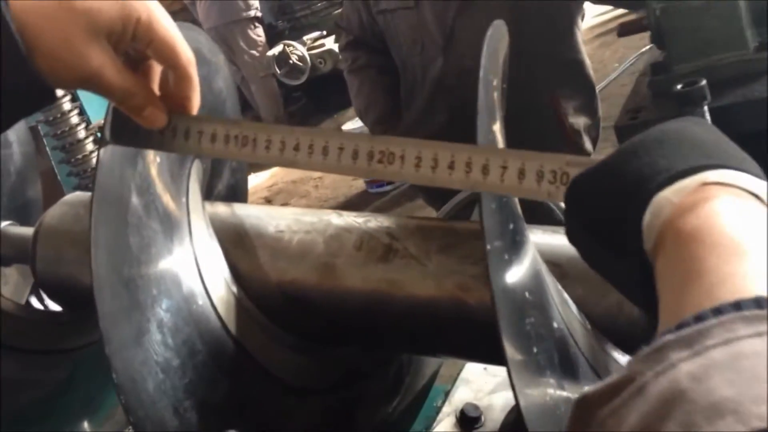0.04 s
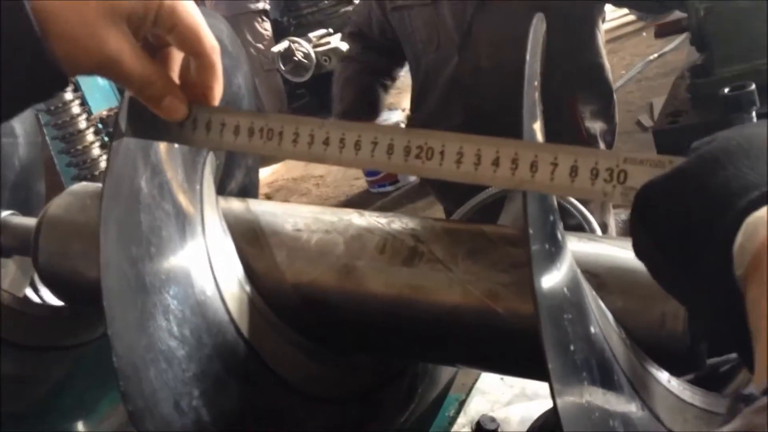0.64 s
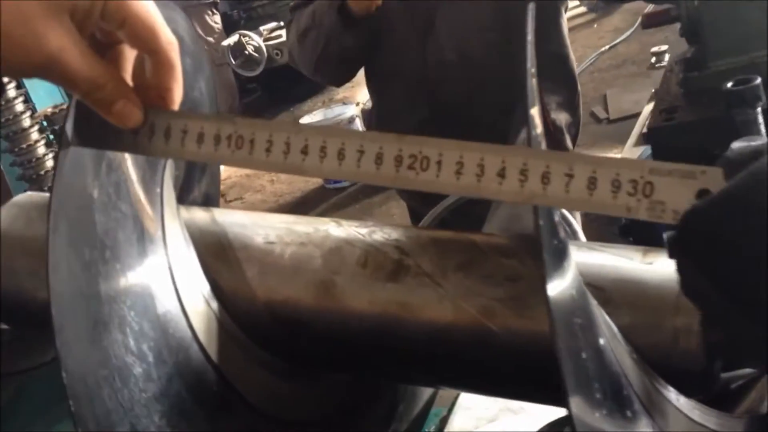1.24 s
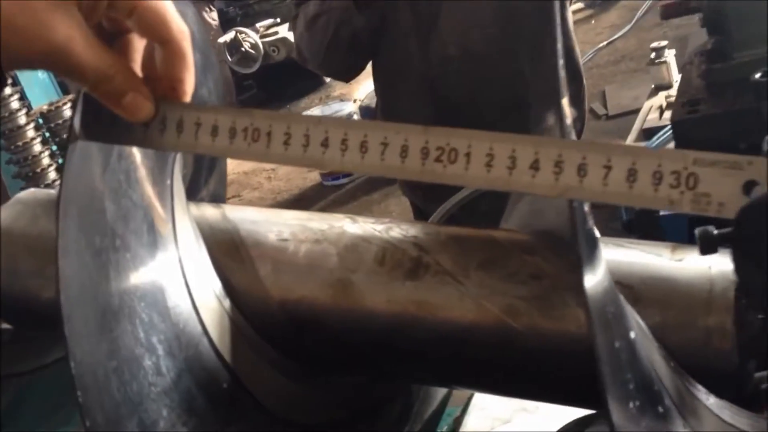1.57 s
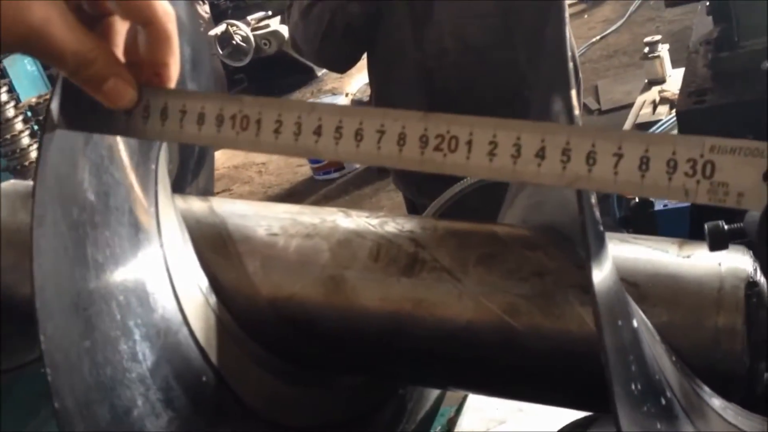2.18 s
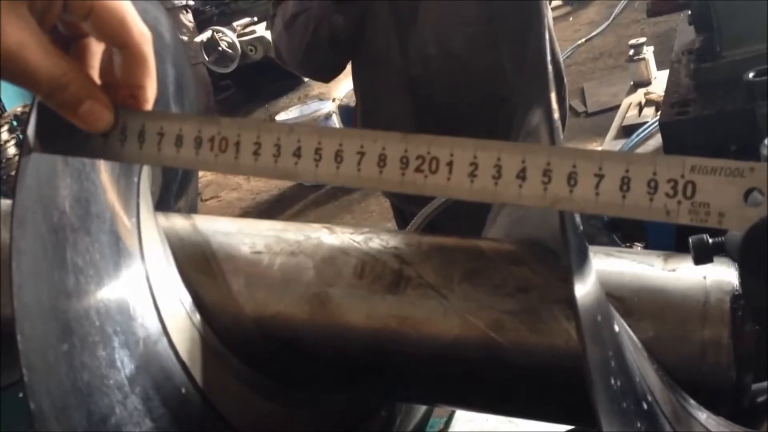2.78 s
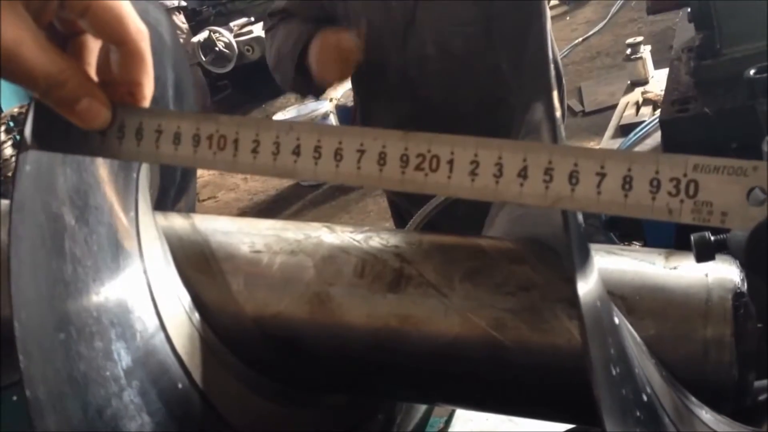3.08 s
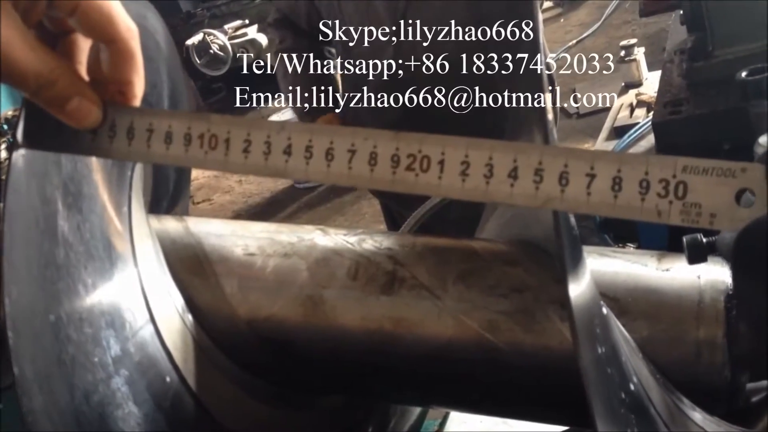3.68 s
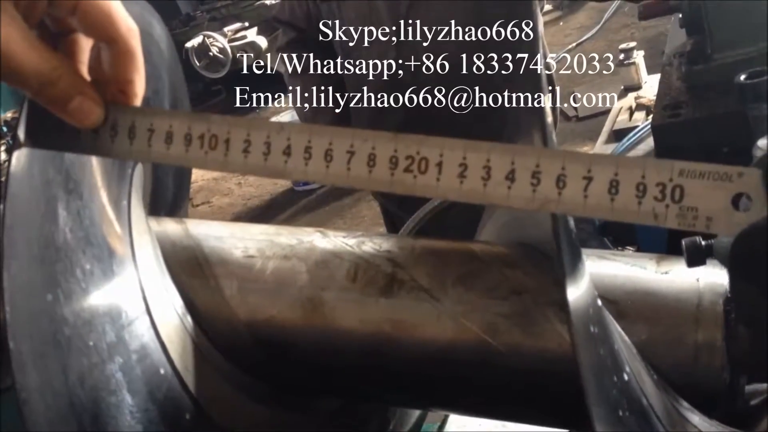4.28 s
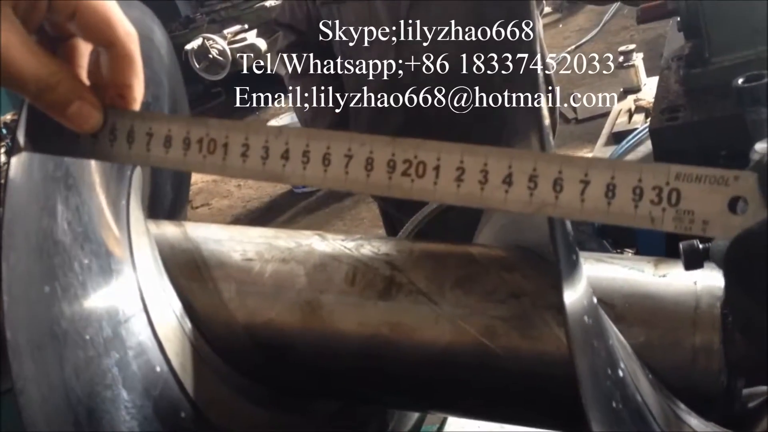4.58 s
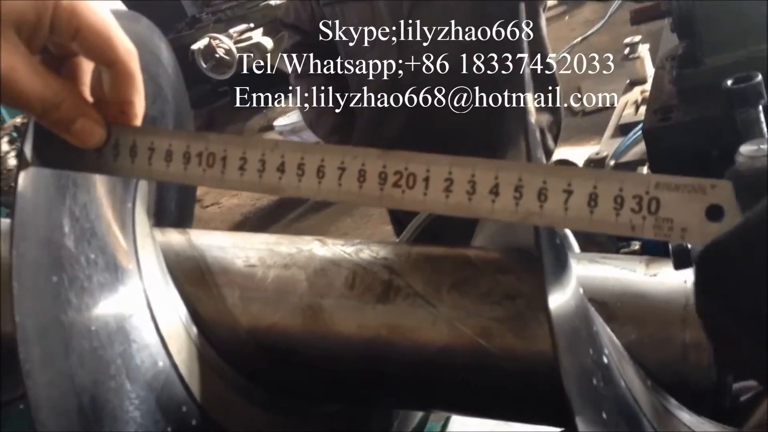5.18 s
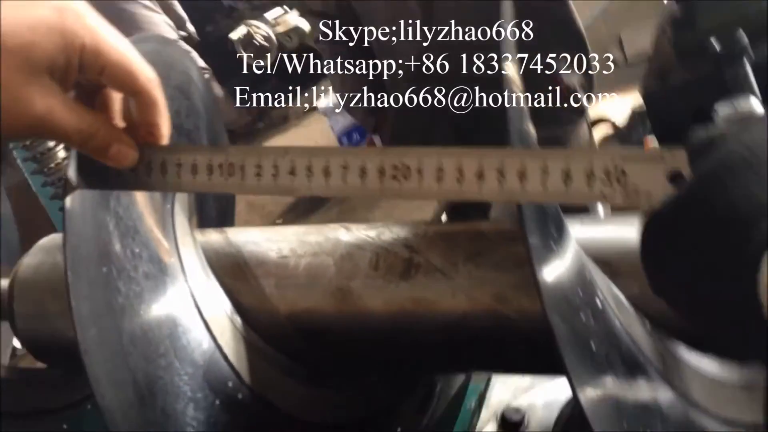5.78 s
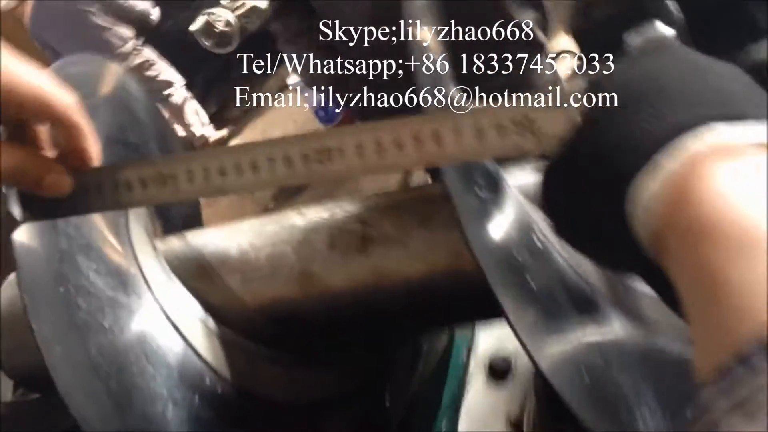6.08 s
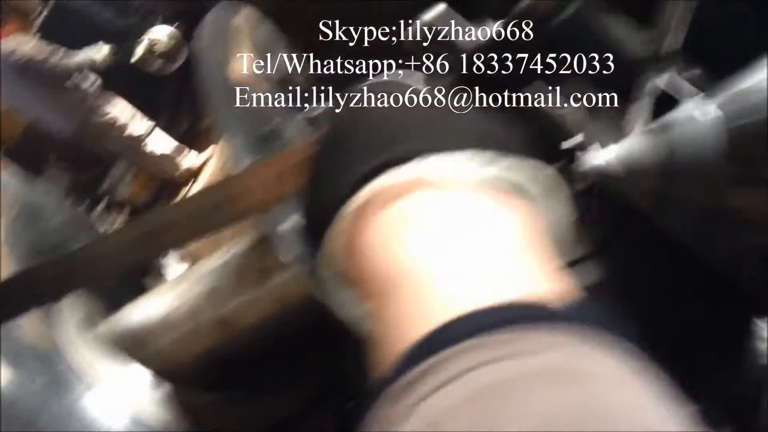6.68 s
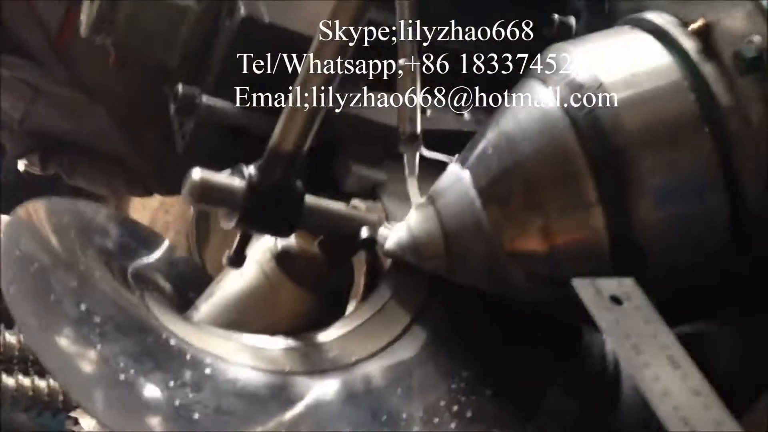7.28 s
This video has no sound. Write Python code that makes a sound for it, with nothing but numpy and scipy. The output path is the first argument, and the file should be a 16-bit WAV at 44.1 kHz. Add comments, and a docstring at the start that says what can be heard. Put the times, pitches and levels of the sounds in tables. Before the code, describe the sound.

A machine tool's cutter chatters loudly against steel, making a ringing drone with a scraping hiss. It starts as a piercing squeal, loosens into a grinding rattle, squeals again, then settles into a lower, harsh buzz. Near the end it stutters, biting back in with short crunches, and finishes in a growl. The workshop walls echo, and other machines rumble faintly underneath.

```python
"""A loud, squealing chatter fills a metal workshop: a machine tool's cutter strikes the steel work
80 to 160 times a second. Every strike rings the steel and scrapes off a hissing chip.
Even strikes make a steady drone, with a squeal in the two fastest spells; uneven ones make a loose rattle.
Near the end the cutter stalls four times, biting back in with a crunch, and finishes in a growl.
The walls echo, and other machines rumble underneath."""
import sys
import numpy as np
from scipy import signal
from scipy.fft import rfft, irfft, next_fast_len
from scipy.io import wavfile
from scipy.ndimage import uniform_filter1d, map_coordinates

SR = 44100
rng = np.random.default_rng(int(sys.argv[2]) if len(sys.argv) > 2 else 0)


def dump_mix(stems):
    """Bounce the given channels to the path in sys.argv[1] as a 16-bit WAV at rate SR."""
    frames = np.atleast_2d(stems).T  # one column per channel
    limited = np.clip(frames, -1, 1)  # hard clip at full scale
    pcm = np.round(limited * 32767).astype(np.int16)
    wavfile.write(sys.argv[1], SR, pcm)


N = 323694

# How the steel rings in each kind of chatter. Each row: frequency in Hz, relative level in dB.
WHINE_START = [(155, -24.5), (310, -11), (465, -22.5), (620, -8), (930, -13), (1240, -18.5), (1395, -6),
               (1550, -5.5), (1700, -22), (1860, -6), (2200, -11.5), (2480, -11.5), (2640, -16), (2935, -8),
               (3100, -16), (3500, -19), (3865, -13.5)]
WHINE = [(150, -32), (300, -11), (760, -12.5), (915, -16.5), (1220, -13.5), (1525, -5.5), (1680, -20),
         (1830, -17), (1980, -6.5), (2130, -15), (2290, -13), (2440, -9.5), (2740, -19), (2900, -10.5),
         (3050, -13), (3200, -23), (4110, -15.5)]
RATTLE = [(170, -16), (250, -20), (335, -10), (420, -18), (580, -11), (670, -13), (750, -5.5), (850, -12),
          (1000, -9.5), (1380, -13), (1520, -3), (1680, 0), (1770, -9), (2060, -9), (2320, -1), (2420, -8),
          (3090, -10), (4180, -21)]
GRINDING = [(170, -20), (410, -15), (560, -8), (1000, -11), (1380, -13), (1520, -1), (1680, 1.5),
            (1790, -9.5), (2060, -10.5), (2200, -4), (2650, -7), (3100, -13), (4180, -23)]
SCREAM = [(160, -32.5), (320, -13), (470, -15.5), (630, -10), (800, -11), (1110, -18), (1420, -12),
          (1585, -19), (1740, -5), (1900, -11.5), (2210, -7), (2370, -10), (2550, -6), (3000, -13.5),
          (3400, -11), (3640, -12.5), (4110, -21.5)]
LIMP = [(160, -28), (320, -13), (480, -16), (640, -13.5), (720, -20), (800, -14.5), (1180, -12),
        (1360, -18), (1525, -2.5), (1610, 2), (1690, 0.5), (1845, -19.5), (2005, -18), (2165, -6),
        (2325, -14), (2520, -7), (2900, -14.5), (4150, -18.5)]
CLATTER = [(170, -16), (260, -18.5), (470, -14.5), (550, -4.5), (640, -9.5), (720, -12), (1150, -10.5),
           (1400, -13.5), (1510, -0.5), (1680, 2.5), (1780, -13), (2030, -14), (2170, -3), (2450, -7.5),
           (2750, -14.5), (2980, -8), (3200, -16), (4180, -22)]
BUZZ = [(190, -18), (280, -9), (480, -7.5), (860, -11), (960, -6), (1140, -8), (1230, -14), (1430, -7),
        (1530, 3), (1620, 2.5), (1950, -10), (2100, -4), (2450, -5), (2700, -10.5), (3620, -11),
        (4200, -24)]
BROAD_BUZZ = [(190, -18), (280, -6.5), (380, -11), (660, -8), (780, -12), (960, -4), (1140, -6),
              (1230, -15), (1330, -2), (1530, 1), (1750, 0), (1950, -8), (2450, -4.5), (2750, -11),
              (4000, -9), (4200, -24)]
DULL_BUZZ = [(150, -21), (188, -22), (278, -13), (523, -15.5), (664, -8.5), (775, -23), (832, -17),
             (957, -17), (1180, -12), (1290, -7), (1680, 0.5), (1990, -12.5), (2290, -9), (3110, -14.5),
             (3740, -15), (4300, -19)]
STUTTER = [(170, -13.5), (250, -8.5), (330, -14), (550, -10.5), (650, -3), (780, -13), (950, -13),
           (1300, -6), (1480, -6), (1670, 2.5), (1780, -11.5), (2320, -9), (2570, -15), (3070, -12.5),
           (3740, -17), (3900, -12), (4150, -16)]
GROWL = [(130, -22), (250, 0), (380, -13.5), (500, -7), (630, -1.5), (750, -16), (1000, -12), (1130, -0.5),
         (1630, -3), (1760, -9), (1880, -6), (2130, -4.5), (2630, -15), (2880, -3), (3010, -13.5),
         (3640, -9), (4400, -11)]
# The chip's hiss under a hard and a light cut. Each row: frequency in Hz, relative level in dB.
HARD = [(2800, -31), (3900, -3), (7500, -6), (7800, 0), (9300, -6.5), (9850, -1.5), (10200, -5),
        (11400, -6.5), (13500, -8.5), (13800, -6), (15000, -8.5)]
LIGHT = [(2800, -31), (3900, -2.5), (4300, -6), (4800, -2), (6300, -6), (6650, -0.5), (6950, -6.5),
         (8700, -1.5), (9500, -8), (9850, -2.5), (10600, -7.5), (15000, -10)]
# The spells of chatter. Each row: start in seconds, ring table, hiss table, timing scatter as a share
# of the gap between strikes, lag of every second strike in seconds, share of fresh noise in the hiss,
# rasp in relative dB, drone in relative dB.
CHATTER_SPELLS = [ (0, WHINE_START, HARD, .0011, 0, 0.26, -15, -3),
                  (.345, WHINE, HARD, .0013, 0, 0.27, -17, -4),
                  (.782, RATTLE, HARD, 0.0091, 0, 0.65, -11, -7),
                  (1.25, GRINDING, HARD, .016, 0.00015, 0.7, -10.5, -7.5),
                  (2.615, SCREAM, HARD, 0.00076, 0, 0.1, -19, -5.5),
                  (3.27, SCREAM, HARD, .0012, 0, .24, -17, -5.5),
                  (3.58, LIMP, LIGHT, 0.00097, 0.00015, 0.2, -17, -6.5),
                  (3.903, CLATTER, LIGHT, .015, 0, .49, -8.5, -7),
                  (4.36, LIMP, LIGHT, 0.006, 0, 0.4, -9, -7), (4.56, BUZZ, LIGHT, .0012, 0, .2, -12, -6),
                  (5.15, BROAD_BUZZ, LIGHT, .0012, 0, .2, -12, -6),
                  (5.94, DULL_BUZZ, LIGHT, .0009, 0, .22, -13, -6.5),
                  (6.34, STUTTER, LIGHT, 0.0038, 0, .57, -7, -3),
                  (6.66, STUTTER, LIGHT, .02, 0.00024, 0.67, -4, 1),
                  (7.012, GROWL, LIGHT, .0013, 0, .33, -11, 3)]
# The cutter barely touches, then bites again.
# Each row: start of the stall in seconds, time of the bite in seconds, crunch level in dB.
STALLS = [(6.714, 6.731, -21), (6.812, 6.843, -13), (6.907, 6.93, -14), (6.978, 7.014, -28)]
GRIP_S = 0.00061  # how fast the scraping rises as the cutter digs in


def amp(db):
    """Turn decibels into a gain."""
    return 10 ** (np.asarray(db) / 20)


def unit(x):
    """Scale x to an average (rms) level of 1."""
    return x / np.sqrt(np.mean(x ** 2) + 1e-20)


def along(points, hz):
    """Read between rows of frequency and value, on a log frequency scale."""
    frequencies, values = np.transpose(points)
    return np.interp(np.log(hz + 1), np.log(frequencies + 1), values)


def curves(rows):
    """Give one value per sample for each column after the time."""
    seconds, *columns = np.transpose(rows)
    return [np.interp(np.arange(N) / SR, seconds, column) for column in columns]


def wobble(rate):
    """Draw a smooth curve through `rate` random points a second."""
    return map_coordinates(rng.standard_normal(size=64), [np.arange(N) * rate / SR], mode="mirror")


def filtered(x, response):
    """Scale each frequency in x by the gain that response(hz) gives."""
    size = next_fast_len(len(x) + 8192)
    return irfft(rfft(x, size) * response(np.fft.rfftfreq(size, 1 / SR)), size)[:len(x)]


def through(x, response):
    """Pass x through something that answers one click with `response`."""
    return signal.fftconvolve(x, response)[:len(x)]


def impulses(times, force, size):
    """Make clean clicks that may fall between samples."""
    centres = times[:, None] * SR + 8
    taps = np.floor(centres).astype(int) + np.arange(-7, 9)
    shape = np.sinc(taps - centres) * np.cos(np.pi * (taps - centres) / 16) ** 2
    return np.bincount(taps.ravel(), (force[:, None] * shape).ravel(), size)[:size]


def body(spectrum, size=4096):
    """How an object with this spectrum answers one click."""
    gain = amp(along(spectrum, np.fft.rfftfreq(size, 1 / SR)))
    cepstrum = irfft(np.log(gain + 1e-6))
    cepstrum[1:size // 2] *= 2  # folded so that nothing sounds before the click
    cepstrum[size // 2 + 1:] = 0
    return irfft(np.exp(rfft(cepstrum)))


def strikes():
    """The cutter hits the steel, evenly or loosely: give each strike's time, strength and spell."""
    # How often it strikes, stretch after stretch. Each row: time in seconds, strikes a second.
    whine_rate = [(0.0, 157), (0.034, 155.4), (0.268, 154.3), (0.362, 152.6), (0.77, 152.7)]
    rattle_rate = [(.785, 83.63), (2.598, 83.84)]
    scream_rate = [(2.602, 157.2), (3.458, 158.6), (3.57, 159.6)]
    limp_rate = [(3.59, 160.9), (3.8, 160.5), (3.895, 158.7), (3.91, 85.15), (4.301, 86.07)]
    buzz_rate = [(4.34, 93.4), (4.38, 94.6), (4.41, 94.12), (4.78, 95.4), (5.86, 94.8), (6.27, 94.03),
                 (6.34, 92.9)]
    end_rate = [(6.43, 90.2), (6.5, 85.8), (6.65, 83), (7.005, 79.9), (7.019, 125.5), (7.34, 125.4)]
    uneven_db, uneven_db_per_scatter, fully_loose_scatter = 0.38, 48, 0.0084
    surge_peak_s, surge_period_s, surge_db = 0.94, .285, 0.54
    stall_db, bite_db = -11, 1

    starts, _, _, scatters, lags, *_ = map(list, zip(*CHATTER_SPELLS))
    spell_at = lambda seconds: np.maximum(np.searchsorted(starts, seconds, side="right") - 1, 0)
    rate = np.vstack([whine_rate, rattle_rate, scream_rate, limp_rate, buzz_rate, end_rate])
    t = np.arange(N) / SR
    strikes_so_far = np.cumsum(curves(rate)[0]) / SR
    k = np.arange(int(strikes_so_far[-1]))
    spell = spell_at(np.interp(k, strikes_so_far, t))
    slip, weight = rng.standard_normal(size=(2, 1000))
    scatter = np.take(scatters, spell)
    limp = uniform_filter1d(np.take(lags, spell), size=14)  # the limp creeps in over several strikes
    times = np.interp(k + np.cumsum(scatter * slip[k]), strikes_so_far, t) + limp * (k % 2)
    # a loose rattle is uneven in strength as well as in time, and comes in surges
    looseness = np.minimum(scatter / fully_loose_scatter, 1)
    surge = looseness * np.cos(2 * np.pi * (times - surge_peak_s) / surge_period_s)
    force_db = (uneven_db + uneven_db_per_scatter * scatter) * weight[k] + surge_db * surge
    for start, bite, _ in STALLS:
        force_db[(times > start) & (times < bite)] += stall_db
        nearest = np.argmin(np.abs(times - bite))
        times[nearest:] += bite - times[nearest]  # the beat restarts from the bite
        force_db[nearest] = bite_db
    return times, amp(force_db), spell_at(times)


def smear(spacing_hz, width_hz, size=4096, count=60):
    """The steel's many resonances each hold back part of a strike: it gets longer, not brighter."""
    resonances = spacing_hz * (np.arange(count) + rng.random(count))[:, None]
    hz = np.fft.rfftfreq(size, 1 / SR)
    phase_lag = 2 * np.arctan2(hz * width_hz, resonances ** 2 - hz ** 2).sum(axis=0)
    return irfft(np.exp(-1j * phase_lag))


def friction(clicks, fade_s):
    """Rubbing makes fresh noise that flares at every strike, falling 60 dB per fade_s."""
    t = np.arange(SR // 10) / SR
    flare = amp(-60 * t / fade_s) * (1 - np.exp(-t / GRIP_S))
    power = through(clicks ** 2, flare ** 2)
    return unit(np.sqrt(np.abs(power)) * rng.standard_normal(len(clicks)))


def steel_ring(ring):
    """The steel answers one click, ringing only between the deep bass and the treble."""
    return body([(70, -48), *ring, (5500, -43)])  # the ring dies out at these ends, given in Hz and dB


def scrape(clicks, fade_s, renew_s):
    """Each strike repeats nearly the same scrape, which changes as the cutter moves on."""
    t = np.arange(SR // 20) / SR
    flare = amp(-60 * t / fade_s) * (1 - np.exp(-t / GRIP_S))
    place = np.arange(len(clicks)) / SR / renew_s
    out = np.zeros(len(clicks))
    for k in range(int(place[-1]) + 2):
        spectrum = rfft(rng.standard_normal(len(t)) * flare)
        strength = np.abs(spectrum)
        burst = irfft(spectrum / np.maximum(strength, np.median(strength)))  # no overtone sticks out
        blend = np.cos(np.pi / 2 * np.clip(place - k, -1, 1))
        out += through(clicks, unit(burst)) * blend
    return unit(out)


def chatter(times, force, spell):
    """Spell after spell, the strikes drive the steel's ring, the chip's hiss and a low drone."""
    # Loudness up to the stalls, then in the closing growl.
    # Each row: time in seconds, ring in relative dB, hiss and drone in relative dB.
    levels = [(0.0, -16, -14), (0.03, -15, -18), (0.4, -16, -18), (0.765, -17, -17.5), (0.795, -16, -17),
              (1.0, -16, -15.5), (1.04, -17, -17.5), (2.01, -17, -18), (2.53, -15, -18), (2.68, -16, -17.5),
              (2.94, -14, -15.5), (3.52, -16.5, -16.5), (3.64, -13, -18), (3.83, -12.5, -16.5),
              (4.04, -16, -19.5), (4.6, -15.5, -18.5), (5.77, -14.5, -16.5), (6.53, -16, -21.5),
              (6.64, -13.5, -20.5), (6.68, -16.5, -24)]
    growl_levels = [(7.05, -15, -21), (7.3, -13.5, -19.5)]
    ring_trim_db, hiss_trim_db, drone_top_hz = -0.6, -0.3, 1200
    layers = np.zeros((2, N + SR))
    steel = smear(spacing_hz=290, width_hz=130)
    machine_bed = smear(spacing_hz=140, width_hz=60)
    for k, (_, ring, hiss, _, _, fresh, rasp_db, drone_db) in enumerate(CHATTER_SPELLS):
        share = uniform_filter1d(np.where(spell == k, 1., 0.), size=5)  # spells blend over 5 strikes
        active = share > 1e-6
        share, own_times = share[active], times[active]
        first = int(own_times[0] * SR)
        span = int((own_times[-1] - own_times[0]) * SR)
        size = span + SR // 10
        offsets = own_times - first / SR
        blows = impulses(offsets, force[active] * share, size)
        rubs = impulses(offsets, force[active] * np.sqrt(share), size)  # noise adds up in power

        push = unit(through(blows, steel)) + amp(rasp_db) * friction(rubs, fade_s=0.16)
        vibration = through(push, steel_ring(ring))
        low = filtered(vibration, lambda hz: hz < drone_top_hz)
        drone = through(low, machine_bed)  # low waves wander on through the machine's base
        chip = np.sqrt(1 - fresh) * scrape(rubs, fade_s=0.06, renew_s=.6)
        chip += np.sqrt(fresh) * friction(rubs, fade_s=0.12)
        ringing = amp(ring_trim_db) * unit(vibration - low)
        cutting = amp(hiss_trim_db) * unit(through(chip, body(hiss))) + amp(drone_db) * unit(drone)
        length_gain = np.sqrt(share.mean() * span / size)  # keeps short and long spells equally loud
        layers[:, first:first + size] += np.array([ringing, cutting]) * length_gain
    gains = amp(curves(np.vstack([levels, growl_levels])))
    return np.sum(layers[:, :N] * gains, axis=0)


def squeal(times):
    """The cutter's own resonance locks to a multiple of the strike rate and sings one piercing tone."""
    # The squeal in the two fastest spells. Each row: time in seconds, level in dB.
    whine_levels = [(0, -27), (.048, -20), (.284, -19), (.37, -16), (.43, -15), (.772, -15.5), (.8, -90)]
    scream_levels = [(2.57, -92), (2.62, -22.5), (2.8, -17), (2.85, -15.5), (3.42, -15.5), (3.58, -19.5),
                     (3.75, -90)]
    waver_db = .5
    phase = 2 * np.pi * np.interp(np.arange(N) / SR, times, np.arange(len(times)))
    whine = amp(curves(whine_levels)[0]) * np.sin(11 * phase)
    scream = amp(curves(scream_levels)[0]) * np.sin(10 * phase)
    return amp(waver_db * wobble(rate=14)) * np.sqrt(2) * (whine + scream)


def steel_reflection(x, delay_s, sway_s, sway_rate):
    """Sound bounces off nearby steel; the hand-held microphone sways, so overtones swell and fade."""
    treble = filtered(x, lambda hz: 1 / (1 + (2000 / (hz + 1)) ** 8))  # a small face mirrors only treble
    delay = delay_s + sway_s * wobble(sway_rate)
    return map_coordinates(treble, [np.arange(N) - delay * SR])


def wall_echo(x):
    """The walls answer, the treble dying first."""
    # How long the echo lasts. Each row: frequency in Hz, seconds to fade by 60 dB.
    fade_times = [(200, 0.34), (2000, 0.51), (10000, 0.02)]
    hz, t, noise = signal.stft(rng.standard_normal(SR // 2), SR, nperseg=256)
    fade = amp(-60 * t / along(fade_times, hz)[:, None])
    tail = signal.istft(noise * fade, SR, nperseg=256)[1]
    return through(x, np.pad(tail, (SR // 100, 0)) / np.linalg.norm(tail))


def other_machines():
    """Other machines rumble, wandering a little in level, and running motors add thin tones."""
    # The rumble's spectrum. Each row: frequency in Hz, relative level in dB.
    rumble_spectrum = [(25, -30), (70, -22), (105, -11), (135, -9), (165, -3.5), (220, -1), (400, -7.5),
                       (900, -6), (2000, -28.5)]
    # The motors' tones. Each row: pitch in Hz, level in dB.
    motor_tones = [(210, -49), (1001, -43)]
    rumble_db, wander_db = -40.5, 3
    rumble = unit(filtered(rng.standard_normal(N), lambda hz: amp(along(rumble_spectrum, hz))))
    t = np.arange(N) / SR
    tones = sum(amp(db) * np.sqrt(2) * np.sin(2 * np.pi * hz * t + wobble(rate=7))
                for hz, db in motor_tones)
    return amp(rumble_db + wander_db * wobble(rate=3.975)) * rumble + tones


def bites():
    """After each stall the cutter digs in with a short crunch of ring and hiss."""
    fade_s, hiss_db = .05, -5
    out, t = np.zeros(N), np.arange(SR // 10) / SR
    for _, bite, db in STALLS:
        noise = rng.standard_normal(len(t))
        ring = unit(through(noise, steel_ring(STUTTER)))
        hiss = amp(hiss_db) * unit(through(noise, body(LIGHT)))
        out[int(bite * SR):][:len(t)] += amp(db - 60 * t / fade_s) * (ring + hiss)
    return out


def scene():
    """Mix the chattering machine with its squeal, its echo and the workshop around it."""
    echo_db = -12.5
    times, force, spell = strikes()
    direct = chatter(times, force, spell) + bites()
    machine = direct + steel_reflection(direct, delay_s=.0052, sway_s=.00011, sway_rate=1.5) / 3
    return (machine + squeal(times) + amp(echo_db) * wall_echo(machine) + other_machines())[None]


def record(dry):
    """The recorder rounds off the highest peaks, thins the bass and drops the very top of the treble."""
    ceiling, low_cut_hz, top_hz = .9, 128, 15500
    rounded = dry[0] / (1 + np.abs(dry[0] / ceiling) ** 8) ** (1 / 8)
    thin = filtered(rounded, lambda hz: 0.15 + 0.94 / (1 + (low_cut_hz / (hz + 1)) ** 6))
    return filtered(thin, lambda hz: hz < top_hz)[None]


dry = scene()
out = record(dry)
dump_mix(out)
```